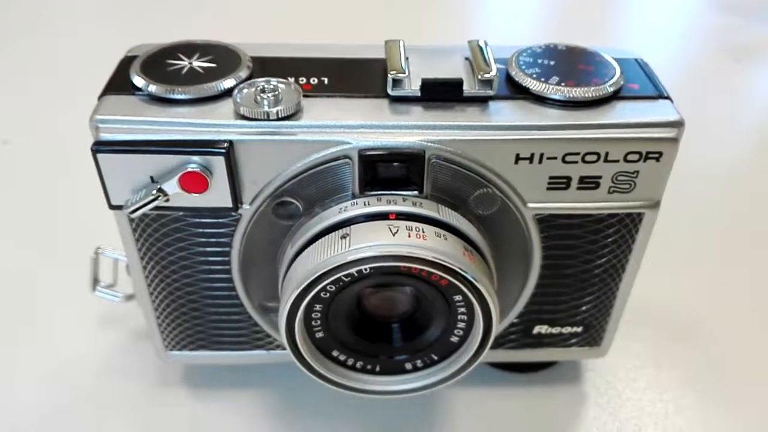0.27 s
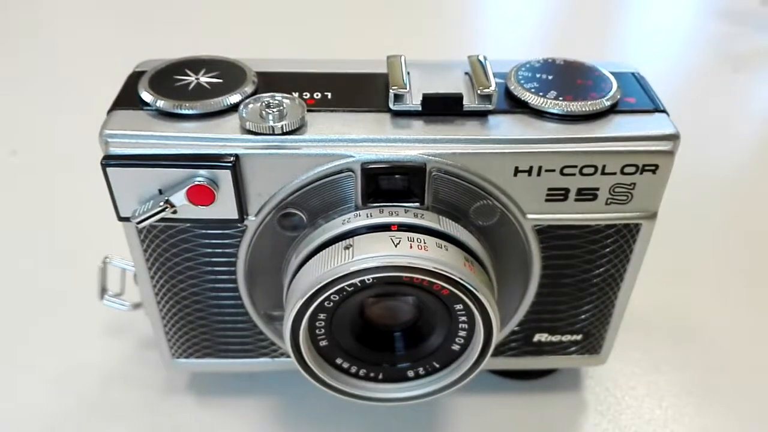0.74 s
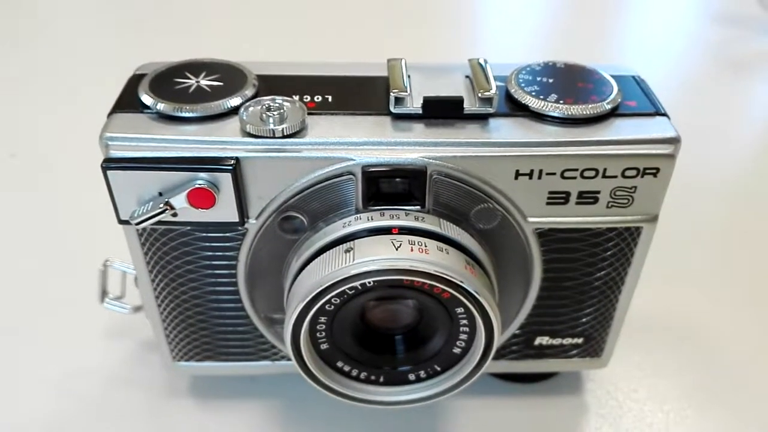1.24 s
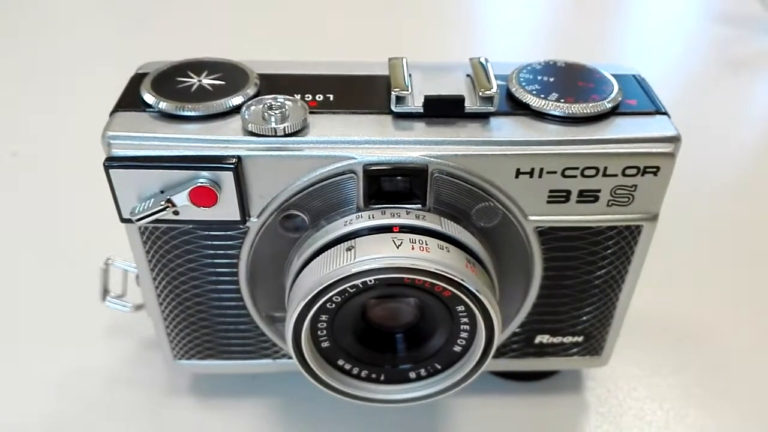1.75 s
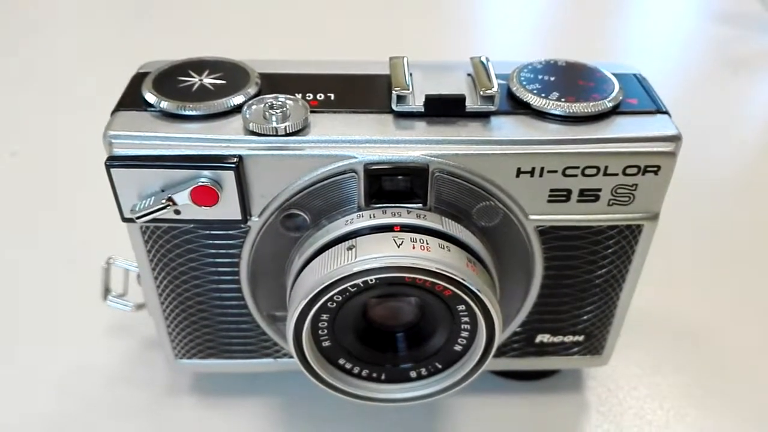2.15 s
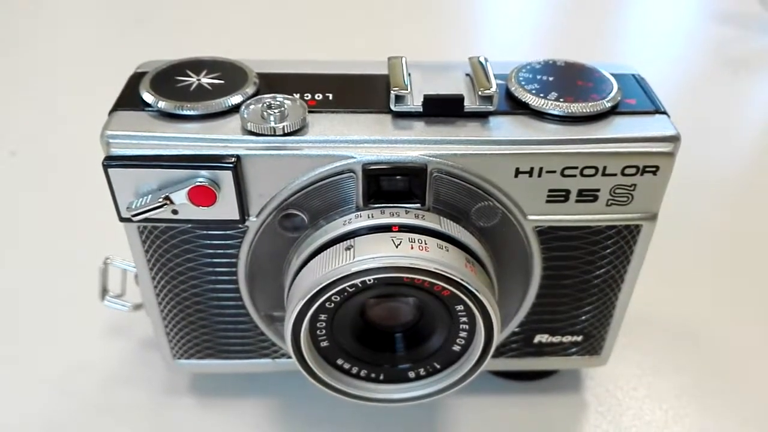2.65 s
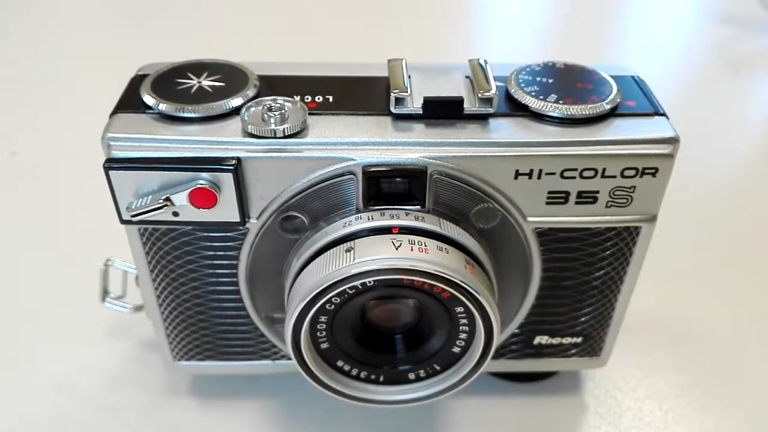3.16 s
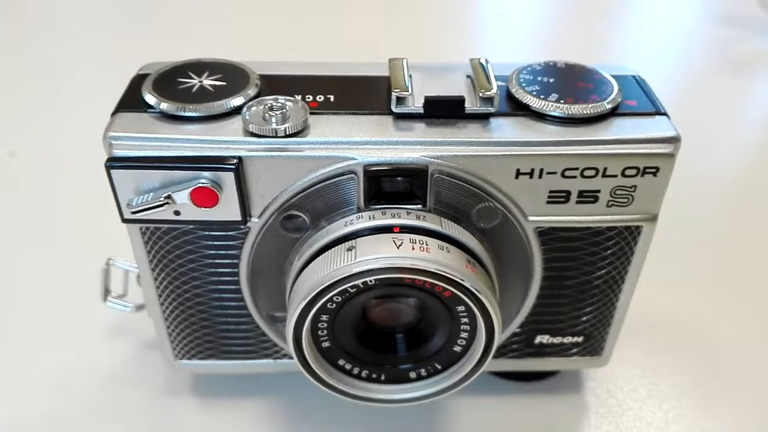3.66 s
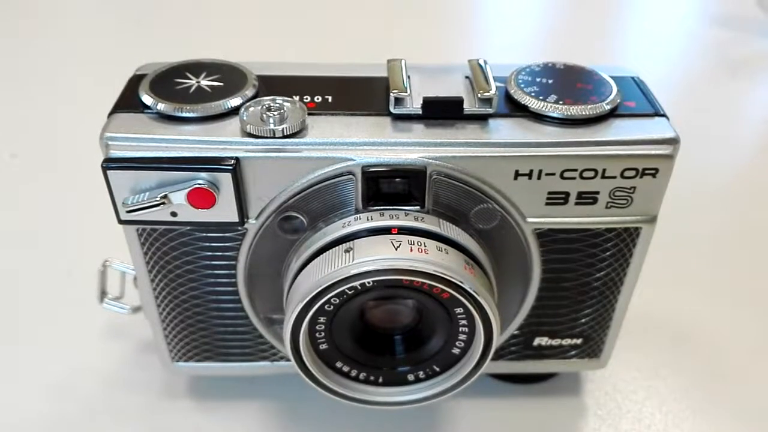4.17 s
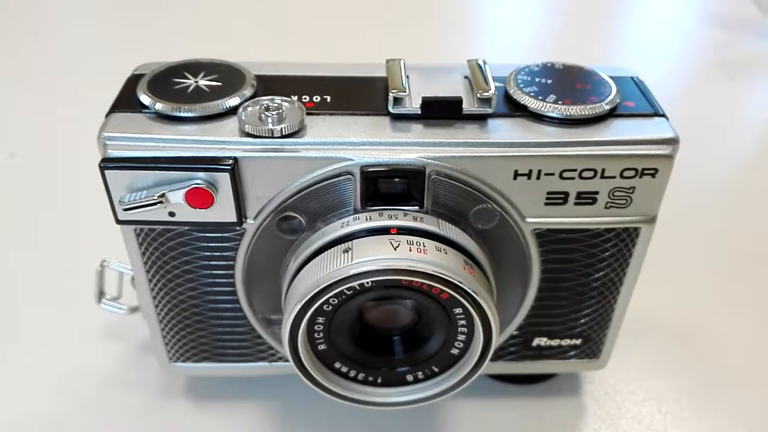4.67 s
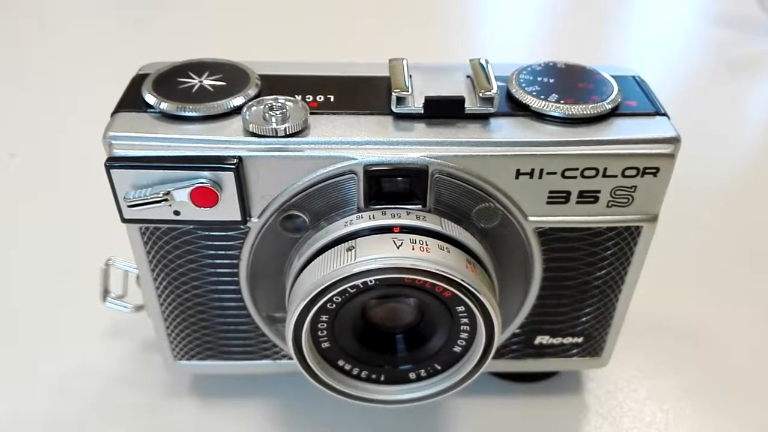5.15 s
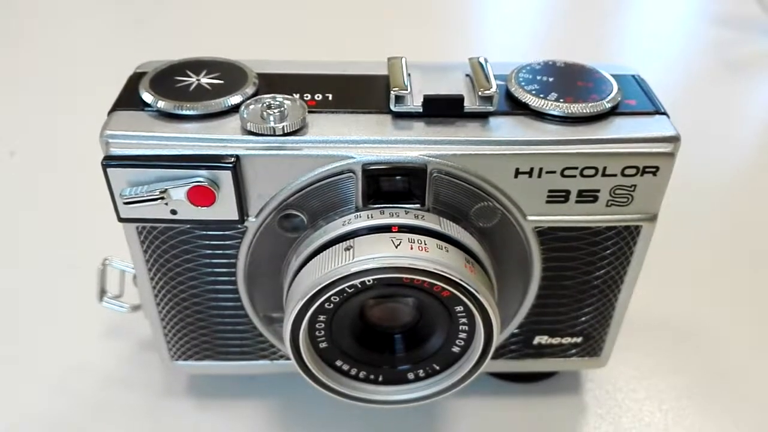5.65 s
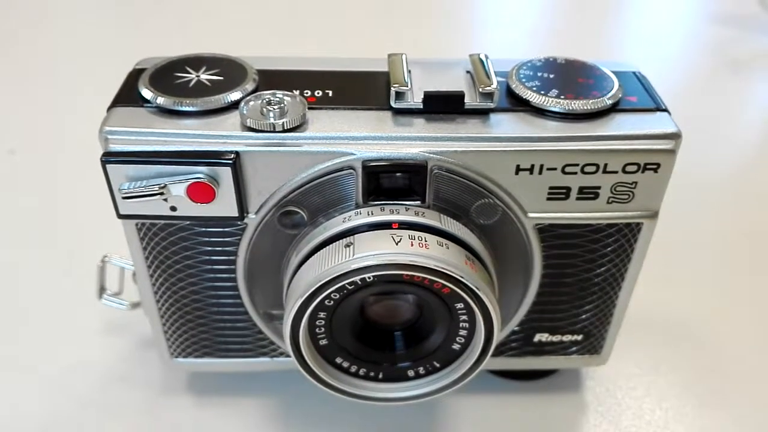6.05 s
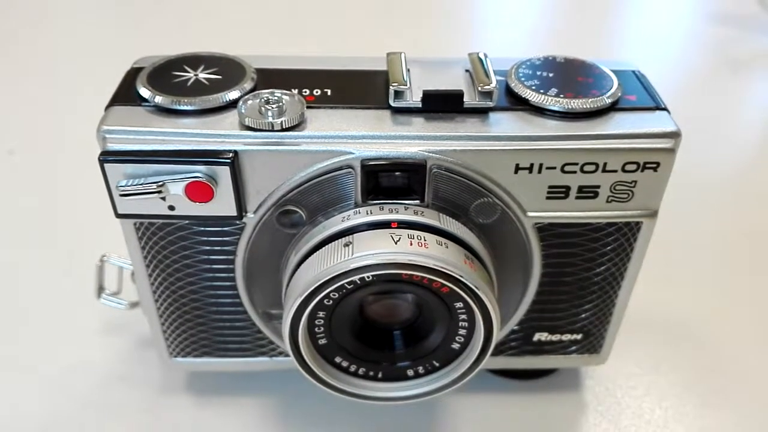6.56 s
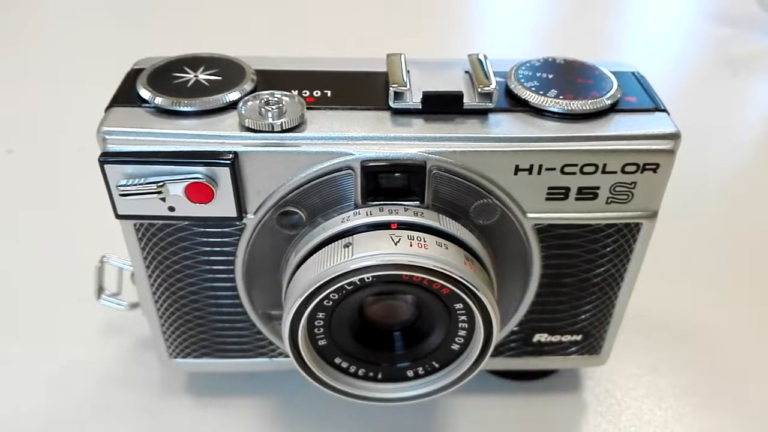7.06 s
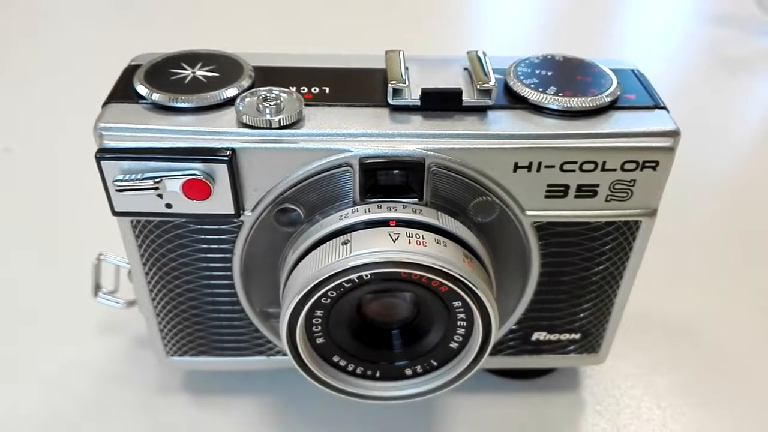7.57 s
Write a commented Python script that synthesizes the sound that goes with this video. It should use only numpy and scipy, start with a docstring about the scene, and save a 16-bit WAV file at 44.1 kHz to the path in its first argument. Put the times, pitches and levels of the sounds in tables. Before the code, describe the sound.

From the first instant a small clockwork self-timer is already running in a metal camera on a table, close to the microphone in a quiet room. Its ticks come well over a hundred a second, merging into a dry, raspy, bright metallic whirr with a grainy flutter and a thin hollow ring from the casing. The speed wavers, sagging briefly around 0.7, 1.7, 3.05, 4.2 and 5.6 seconds and recovering each time, with occasional slightly sharper clicks. The level stays modest and even until about 6.7 seconds. Then the mechanism labours: the whirr slows, coarsens into a rattle and drops sharply around 7.1, staying very faint until about 7.45. It picks up again, faster and louder, still running at the end near 7.8. Faint low rumble, soft hush and short distant hums sit far underneath.

```python
"""A fast metallic whirr: the clockwork self-timer of a small metal camera on a table, close to the microphone.
An anchor rocks on the escape wheel, tick and tock over a hundred times a second for most of the run.
Each contact is a short noise burst that rings wheels, bridge, plates, cover, shell and table top.
The train labours near the end, nearly stalls and picks up again.
Behind it the quiet room rumbles and hushes (shaped noise) and short far hums come and go (sine tones)."""
import sys
import numpy as np
from scipy import signal
from scipy.fft import rfft, irfft, next_fast_len
from scipy.io import wavfile
from scipy.ndimage import uniform_filter1d, map_coordinates

SR = 44100
rng = np.random.default_rng(int(sys.argv[2]) if len(sys.argv) > 2 else 0)


def wrap_up_sound(samples):
    """Save the sound to the file named by the first command line argument, as 16-bit audio."""
    columns = np.atleast_2d(samples).T
    # keep every value between -1 and 1, then stretch to whole-number steps
    tamed = np.clip(columns, -1, 1)
    steps = np.round(tamed * 32767).astype(np.int16)
    wavfile.write(sys.argv[1], SR, steps)


N = 344762

# hardest contacts of anchor and wheel, strength before the train's level is taken off: (time [s], strength [dB])
HARD_CONTACTS = [(1.9885, -15), (2.031, -11), (2.087, -14), (2.2338, -15), (3.0655, -19), (4.4745, -14),
                 (4.83, -13), (5.8698, -17), (6.177, -17.5), (6.308, -21), (6.82, -27.5), (6.8654, -24.5),
                 (6.89, -27), (6.9208, -28), (6.9556, -27.5), (6.995, -26), (7.0283, -29), (7.0467, -26),
                 (7.081, -31), (7.208, -36.5), (7.2486, -38.5), (7.309, -39), (7.3276, -40), (7.3438, -37),
                 (7.4313, -40), (7.4967, -37), (7.5634, -30), (7.59, -27), (7.602, -25), (7.651, -25),
                 (7.7142, -22.5), (7.736, -25), (7.7932, -24)]


def amp(db):
    """Decibels to gain."""
    return 10 ** (np.asarray(db) / 20)


def unit(x):
    """Scaled to rms 1."""
    return x / np.sqrt(np.mean(x ** 2) + 1e-20)


def along(points, hz):
    """Interpolates (frequency, value) points on a log frequency axis."""
    f, v = np.transpose(points)
    return np.interp(np.log(hz + 1), np.log(f + 1), v)


def curves(rows):
    """One value per sample for each column after the time."""
    times, *columns = np.transpose(rows)
    return [np.interp(np.arange(N) / SR, times, column) for column in columns]


def wobble(rate):
    """A smooth random curve through `rate` random knots a second."""
    knots = rng.standard_normal(int(N * rate / SR) + 4)
    return map_coordinates(knots, [np.arange(N) * rate / SR])


def filtered(x, response):
    """x shaped by a complex response of frequency."""
    m = next_fast_len(N + SR // 2)
    spectrum = rfft(x, m) * response(np.fft.rfftfreq(m, 1 / SR))
    return irfft(spectrum, m)[..., :N]


def rung(x, modes):
    """x through a sum of resonances with alternating signs, as a struck part rings at its own pitches."""
    def response(f):
        return sum((-1) ** k * amp(db) * 1j * f * width / (centre ** 2 - f ** 2 + 1j * f * width)
                   for k, (centre, width, db) in enumerate(modes))
    return filtered(x, response)


def clockwork():
    """The escapement rings wheels, bridge, plates, cover, shell and table; speed changes level and balance."""
    # the train's level at 120 swings a second: (time [s], level [dB])
    train_level = [(0, -35.5), (.5, -35), (.75, -35), (1.0, -36), (1.6, -35.5), (2.2, -35.5), (2.9, -36),
                   (3.38, -35.5), (3.6, -35.5), (4.4, -36), (5.2, -36), (5.6, -36.5), (6.1, -36),
                   (6.78, -37.5), (6.84, -38.5), (7.1, -40.5), (7.16, -50), (7.24, -49), (7.33, -48.5),
                   (7.41, -51.5), (7.52, -46.5), (7.64, -42.5), (7.82, -39.5)]
    # moments when the whirr dips briefly: (time [s], depth [dB])
    dips = [(1.72, 1.5), (3.05, 3), (3.379, 3.5), (4.2, 2.5), (6.16, 1.5), (6.85, 4), (7.48, 2)]
    # parts under the train's level: (time [s], cover [dB], shell [dB], table top [dB])
    shares = [(0, -14, -11.5, -26), (2.8, -12, -12, -26), (3.08, -11.5, -12, -33), (3.3, -12, -12.5, -26),
              (4.3, -11, -12, -26.5), (5.4, -11.5, -12, -26.5), (5.6, -11.5, -11, -29.5),
              (6.05, -14, -13, -29), (6.25, -10, -12.5, -31.5), (6.8, -9, -13, -30), (7.13, -7, -12, -36),
              (7.22, -11, -14, -26), (7.42, -6.5, -12, -24), (7.6, -8, -18.5, -30), (7.82, -9, -13.5, -28)]
    # resonances of each part, strengths relative within the part: (centre [Hz], width [Hz], strength [dB])
    wheel_modes = [(10420, 590, -7), (11450, 110, 2), (11580, 136, -2), (12920, 1100, -4.5),
                   (13600, 230, -1.5), (14030, 420, -9)]  # small wheels of the train
    bridge_modes = [(7160, 840, -2.5), (7970, 290, -0.5), (8320, 440, 1), (9420, 920, 1.5)]  # bridge of the train
    plate_modes = [(5109, 129, -0.5), (5300, 137, -0.5), (5560, 326, -4.5), (6420, 114, -10)]  # steel plates of the train
    cover_modes = [(3167, 54, 2), (3412, 106, 0.5), (3608, 87, -0.5), (3827, 91, -3.5), (4080, 91, -7.5),
                   (4303, 81, -4.5), (4700, 170, -11.5)]  # top cover of the camera
    shell_modes = [(2457, 190, -3), (2678, 145, 1.5), (2922, 125, 1), (3126, 25, -12)]  # hollow shell of the camera
    table_modes = [(570, 43, -7.5), (960, 57, -10), (1186, 49, -1.5), (1296, 29.5, 2), (1433, 68, -3),
                   (1800, 186, -3), (1983, 91, 2)]  # table top under the camera
    db_per_octave = 8.5  # louder with speed
    dip_s = 0.014  # from the bottom of a dip to 1/e of its depth

    speed, swings = anchor()
    pace = np.log2(speed / 120)  # octaves above the usual speed
    t = np.arange(N) / SR
    dip_db = sum(depth * np.exp(-((t - time) / dip_s) ** 2) for time, depth in dips)
    level_db = curves(train_level)[0] + db_per_octave * pace - dip_db
    cover_db, shell_db, table_db = curves(shares)

    hits = contacts(swings, level_db)
    scrape = amp(6 * pace + 0.8 * pinion_mesh(swings))  # fast teeth scrape more
    wheels = amp(-3.1) * chatter(
        hits, wheel_modes, early=0, t60=0.0085, slide=0.25 * scrape, scatter_db=1.9)
    bridge = amp(-4.6 - 0.8 * pace) * chatter(
        hits, bridge_modes, early=0, t60=0.0095, slide=0.27 * scrape, scatter_db=1.9)
    plates = amp(-9.5 + 1.1 * pace) * chatter(
        hits, plate_modes, early=0.0003, t60=0.011, slide=0.3 * scrape, scatter_db=2.0)
    cover = amp(cover_db) * chatter(
        hits, cover_modes, early=0.001, t60=0.0039, slide=0.16 * np.sqrt(scrape), scatter_db=1.3)
    shell = amp(shell_db) * chatter(
        hits, shell_modes, early=0.0012, t60=0.0051, slide=0.12 * scrape, scatter_db=0.0)
    table = amp(table_db) * chatter(
        hits, table_modes, early=0.00108, t60=0.014, slide=0.44 * scrape, scatter_db=2.0)

    # quick random unevenness in the loudness of the whirr
    flutter = amp(0.31 * wobble(8) + 0.68 * wobble(17) + 0.57 * wobble(45))
    return amp(level_db) * flutter * (wheels + bridge + plates + cover + shell + table)


def anchor():
    """Speed of the anchor [swings/s] and its running count of swings; an off-centre wheel ripples the speed."""
    # it sags as the train binds and climbs back, before the ripple: (time [s], speed [swings/s])
    swing_speed = [(0.0, 139.1), (0.36, 146.98), (0.56, 134.29), (0.68, 117.08), (0.82, 127.88),
                   (1.6, 140.66), (1.76, 120.99), (2.0, 122.04), (2.2, 128.36), (2.8, 131.89),
                   (3.06, 106.85), (3.5, 123.37), (4.06, 130.72), (4.24, 111.45), (5.2, 127.06),
                   (5.42, 121.52), (5.58, 105.8), (5.76, 113.49), (6.07, 117.83), (6.2, 107.45),
                   (6.68, 105.84), (6.84, 76.49), (6.93, 69.06), (7.08, 54.7), (7.25, 49.76), (7.42, 60.53),
                   (7.58, 76.88), (7.82, 89.6)]
    ripple, ripple_swings, ripple_turn = 0.021, 33.75, 0.47  # share of speed, swings a turn, high point [turns]
    first_swing = 5.43  # the count at the start [swings]

    speed = curves(swing_speed)[0]
    turns = np.cumsum(speed) / SR / ripple_swings
    speed = speed * (1 + ripple * np.cos(2 * np.pi * (turns - ripple_turn)))
    return speed, first_swing + np.cumsum(speed) / SR


def pinion_mesh(swings):
    """Swell of a pinion that meshes three times in seven swings, from -1 to 1."""
    return np.cos(2 * np.pi * (3 / 7 * swings - 0.27))


def contacts(swings, level_db):
    """Sample and strength [dB] of every tick, tock and rebound; the hardest stand in for their neighbours."""
    # tick, tock and rebound: (place in the swing [0-1], strength [dB], swell by the pinion [dB])
    swing_contacts = [(.76, 0, 2.3), (.2, -1.5, 1.2), (.97, -8, 3)]
    hard_s, hard_db = np.transpose(HARD_CONTACTS)
    hard = np.round(hard_s * SR).astype(int)
    places, blows = [hard], [hard_db - level_db[hard] - 16.0]
    whole = np.arange(np.ceil(swings[0]), swings[-1] - 1)
    for place, db, swell_db in swing_contacts:
        luck = rng.standard_normal((len(whole), 2))  # in timing and in strength
        due = whole + place + 0.023 * luck[:, 0]
        strength = db + swell_db * pinion_mesh(due) + 0.36 * luck[:, 1]
        at = np.clip(np.searchsorted(swings, due), 0, N - 1)
        free = np.abs(at[:, None] - hard).min(axis=1) > SR // 400  # 2.5 ms clear of a hard one
        places.append(at[free])
        blows.append(strength[free])
    return np.concatenate(places), np.concatenate(blows)


def chatter(hits, modes, early, t60, slide, scatter_db):
    """Contacts reach a part at scattered strengths, as fast-dying noise bursts over the scrape of sliding teeth."""
    at, db = hits
    # a hard blow (they come first in the list) shakes every part more alike
    steady = np.where(np.arange(len(at)) < len(HARD_CONTACTS), 0.3, 1)
    at = np.maximum(at - round(early * SR), 0)  # start earlier: narrow resonances build up slowly
    blow_db = db + scatter_db * steady * rng.standard_normal(len(at))
    power = np.bincount(at, amp(2 * blow_db), N)

    t = np.arange(SR // 25) / SR
    decay = amp(-120 * t / t60) * (1 - np.exp(-t / 0.0001))  # of power, 60 dB down after t60 seconds
    burst = np.abs(signal.fftconvolve(power, decay)[:N])
    ring = rung(np.sqrt(burst + slide ** 2) * rng.standard_normal(N), modes)

    drift = amp(0.53 * wobble(7))  # slow random drift in the level of each part
    mean_power = np.abs(uniform_filter1d(ring ** 2, size=SR // 6))
    return drift * ring / np.sqrt(mean_power + 1e-12)


def room():
    """Low rumble that swells and sinks, under a faint hush: two noises shaped in frequency."""
    # colour of the hush, relative: (frequency [Hz], density [dB per Hz])
    hush_colour = [(41, -50), (70, -1.5), (130, -4.5), (195, -3.5), (301, -9.5), (337, -13.5), (746, -21.5),
                   (790, -15.5), (887, -15.5), (2200, -31), (2860, -67), (4840, -120)]
    # colour of the low rumble, relative: (frequency [Hz], density [dB per Hz])
    rumble_colour = [(10, -13), (22, -3), (40, -2), (60, -10), (85, -38), (150, -42)]
    # the rumble before its random swell: (time [s], level [dB])
    rumble_level = [(0, -53), (.3, -52.5), (1.3, -51.5), (2.45, -54), (2.6, -49), (3.12, -47.5), (3.2, -53),
                    (3.8, -58.5), (4.2, -53.5), (4.7, -63), (5.2, -58), (5.8, -56), (6.0, -64),
                    (6.25, -55.5), (7.82, -60)]

    def noise(colour):
        return unit(filtered(rng.standard_normal(N), lambda hz: amp(along(colour, hz))))

    rumble = amp(curves(rumble_level)[0] + 1.4 * wobble(7.3)) * noise(rumble_colour)
    hush = amp(-67.0 + 1.3 * wobble(4)) * noise(hush_colour)
    return rumble + hush


def hums():
    """Short soft sine tones from far away, slightly unsteady in level."""
    # peak level before the waver: (start [s], length [s], pitch [Hz], level [dB])
    far_tones = [(0.0, 0.21, 156, -58.5), (0.0, .2, 111, -62), (.33, 0.26, 276, -56), (.38, 0.15, 571, -64),
                 (3.65, 0.16, 158.4, -63.5), (4.75, 0.24, 562, -69), (5.08, 0.24, 573, -70),
                 (5.18, 0.15, 197, -63), (5.7, 0.35, 201.3, -69), (6.4, 0.17, 157, -61.5),
                 (6.42, .14, 196, -66), (6.8, 0.14, 112, -55), (6.8, 0.24, 157.3, -65),
                 (7.5, 0.14, 151, -60.5)]
    out = np.zeros(N + SR)
    waver = amp(2.1 * wobble(25))
    for start, length, hz, db in far_tones:
        t = np.arange(round(length * SR)) / SR
        swell = np.sin(np.pi * t / length) ** 0.65
        out[round(start * SR):][:len(t)] += amp(db) * swell * np.sin(2 * np.pi * hz * t)
    return out[:N] * waver


def scene():
    """Nearly mono; left and right part in passing patches of time and frequency, mostly in the treble."""
    # where the two sides part: (frequency [Hz], share of the time [0-1], side against middle [dB])
    width = [(30, .1, -24), (200, .12, -11), (600, .1, -7), (1300, .03, -10), (2500, .01, -18),
             (4600, .04, -8), (5300, .2, -4), (6300, .35, -2), (7500, .55, -4), (8800, .6, -4),
             (9800, .2, -2), (12500, .22, -1), (14200, .12, -2)]
    mid = clockwork() + room() + hums()
    hz, _, z = signal.stft(mid, SR, nperseg=512)

    field = uniform_filter1d(rng.standard_normal(z.shape), size=24, axis=0)
    field = uniform_filter1d(field, size=8, axis=1)
    rank = field.argsort(axis=1).argsort(axis=1) / z.shape[1]  # 0-1 in each frequency band
    corner, share, side_db = np.transpose(width)
    patches = rank < np.interp(hz, corner, share)[:, None]
    apart = patches * amp(np.interp(hz, corner, side_db))[:, None]
    random_phase = np.exp(2j * np.pi * rng.random(z.shape))
    side = signal.istft(z * apart * random_phase, nperseg=512)[1][:N]
    return np.array([mid + side, mid - side])


def record(dry):
    """The recorder's band limit: a steep slope 120 Hz wide, nothing above it."""
    top_hz = 14280  # middle of the slope
    return filtered(dry, lambda hz: np.clip((top_hz + 60 - hz) / 120, 0, 1) ** 2)


dry = scene()
out = record(dry)
wrap_up_sound(out)
```